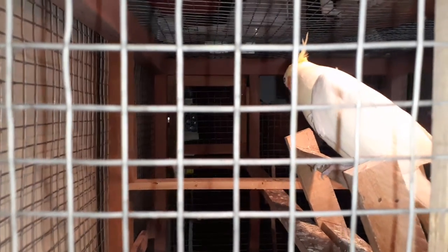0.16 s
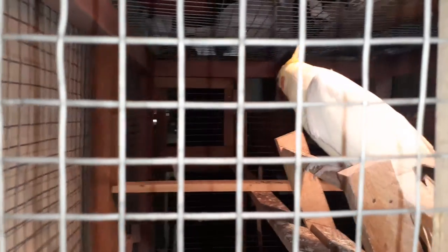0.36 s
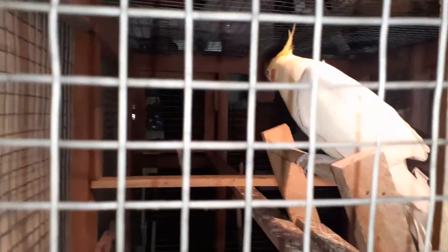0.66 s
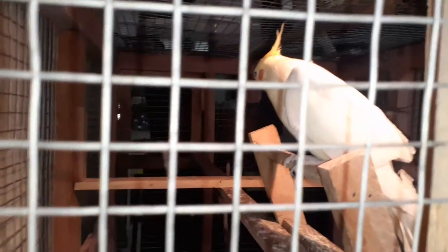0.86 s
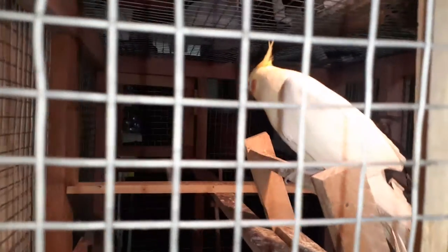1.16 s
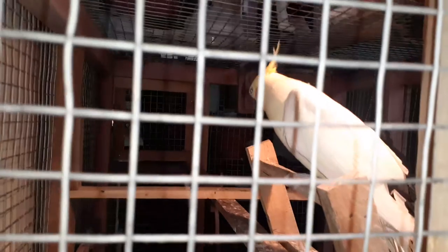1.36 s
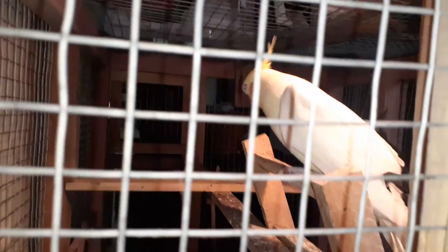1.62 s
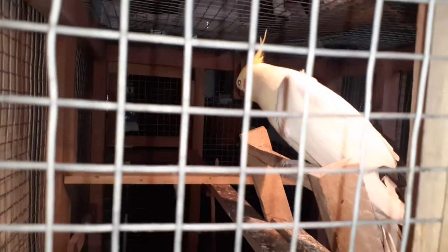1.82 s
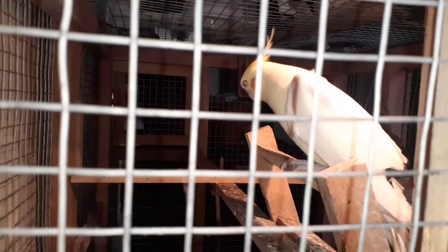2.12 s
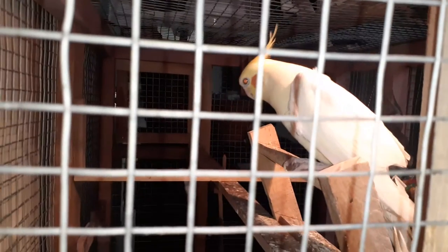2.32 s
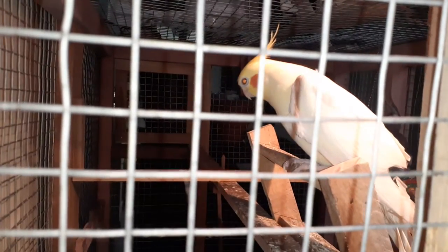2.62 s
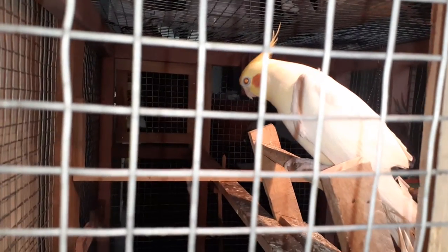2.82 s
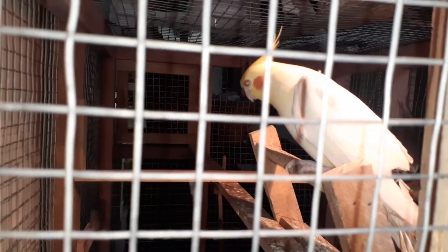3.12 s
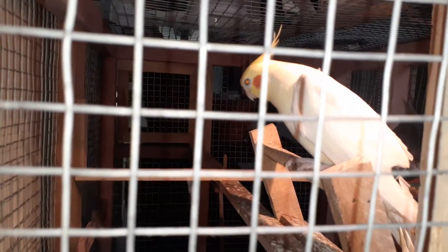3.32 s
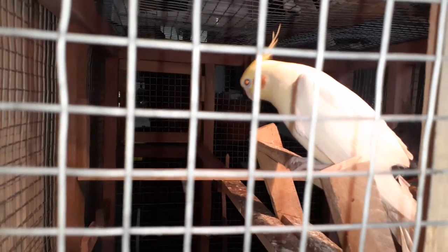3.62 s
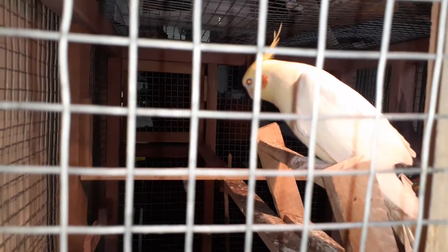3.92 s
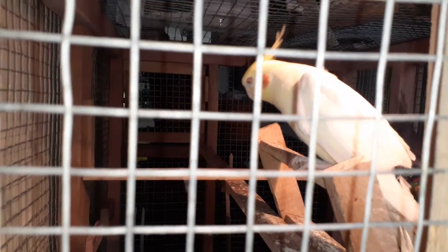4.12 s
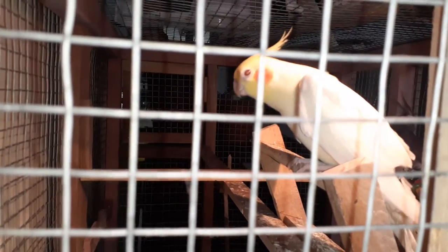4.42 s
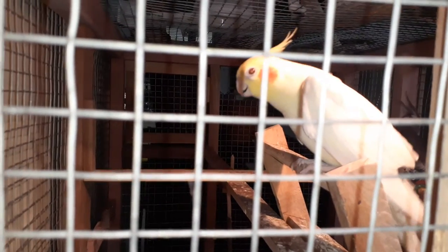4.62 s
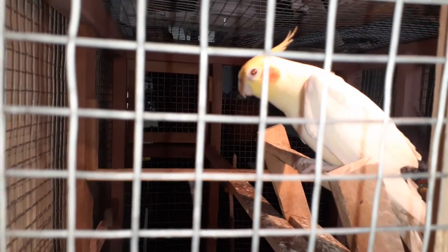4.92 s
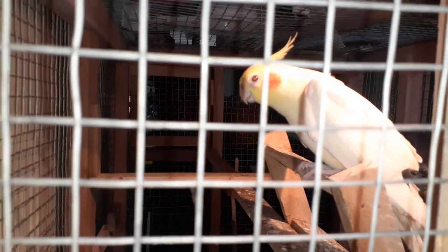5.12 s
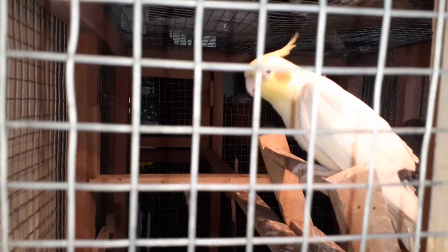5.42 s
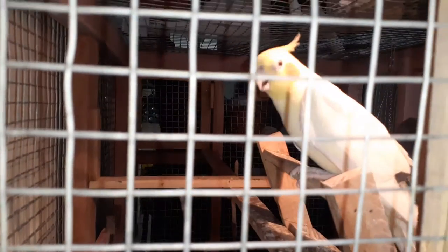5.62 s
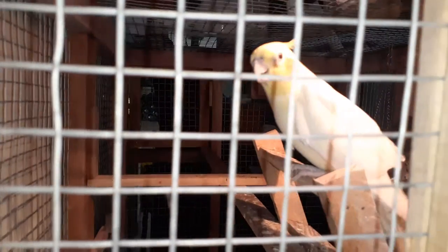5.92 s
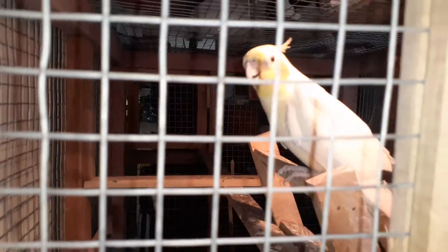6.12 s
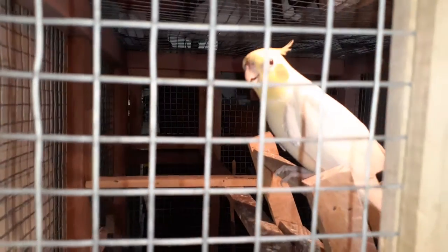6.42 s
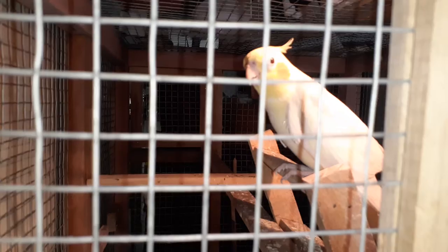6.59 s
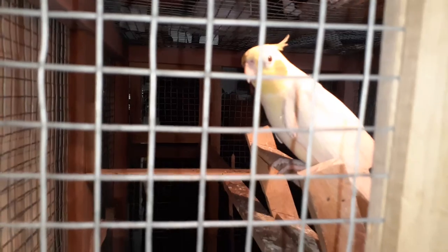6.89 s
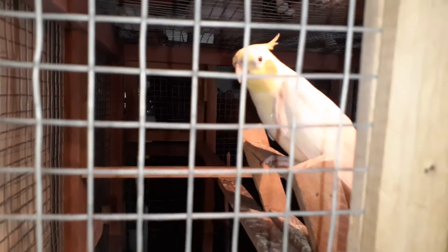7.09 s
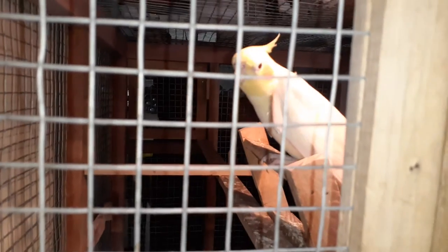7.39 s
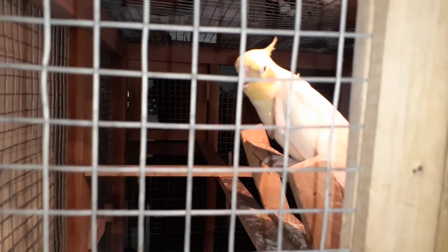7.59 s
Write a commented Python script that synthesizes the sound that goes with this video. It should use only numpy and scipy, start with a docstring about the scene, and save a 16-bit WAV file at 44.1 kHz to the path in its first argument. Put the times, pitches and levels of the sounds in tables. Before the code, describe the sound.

A cockatiel close by whistles short gliding notes in uneven phrases, then a quick, even run of chirps, ringing in a wooden aviary over faint outdoor murmur.

```python
"""A cockatiel whistles in a wooden aviary, close to a phone whose left port faces it.
Each note is a short glide of a harmonic voice, built from sine waves and breath, that rings on in the shed.
Behind it lie a low outdoor murmur of air and traffic and soft puffs of hiss, both made of shaped noise,
and one hoarse buzz, made of pulses that ring a hollow body with noise on each pulse."""
import sys
import numpy as np
from scipy import signal
from scipy.fft import rfft, irfft, next_fast_len
from scipy.io import wavfile
from scipy.ndimage import uniform_filter1d, map_coordinates

SR = 44100
rng = np.random.default_rng(int(sys.argv[2]) if len(sys.argv) > 2 else 0)


def pcm_store(signal):
    """Save signal as 16-bit PCM."""
    levels = np.round(np.clip(np.atleast_2d(signal), -1, 1) * 32767)
    wavfile.write(sys.argv[1], SR, levels.astype(np.int16).T)


N = 341775
LEAD = SR // 5  # samples made ahead of time zero, so an earlier note can still ring at the start
TOP_HZ = 15830  # the phone keeps nothing from here up
BUZZ_HZ = 123  # average pulses a second

# The four note tables share their columns. A note scoops up to its pitch, holds it while drifting, then bends.
# Each row: start in seconds, scoop, hold and bend lengths in seconds, pitch in Hz at the start, after the scoop,
# after the hold and at the end, level of the leading low partial in dB after the scoop, after the hold and
# at the end, other low partial over the leading one in dB before it fades, treble level in dB at its peak,
# place of that peak as a share 0-1 of the note, left over right in dB, lag of the right in ms,
# third and fourth partials in dB relative to the low ones, hoarseness 0-1.
# Bright whistles: cycles come in nearly even pairs, so the second partial leads.
WHISTLE_NOTES = [ (-.14, .02, 0.044, 0.012, 1070, 1270, 1245, 1250, -18, -12.5, -34.5, -34.5, -32, 0.3, 5, .4, -58, -20, 0.31),
                 (1.405, .036, .056, .028, 1332, 1354, 1338, 1440, -11.5, -14, -12.5, -53, -37, .45, 7, .43, -37.5, -19, .04),
                 (1.803, .041, .018, .068, 910, 1365, 1285, 1595, -14, -15, -9.5, -40.5, -32.5, 0.5, 9, .41, -42, -23.5, 0.03),
                 (2.306, 0.024, .085, 0.015, 1235, 1322, 1300, 950, -15, -19, -38, -61.5, -38, 0.7, 8.5, .57, -38, -16, 0.08),
                 (4.123, .025, .035, .055, 1048, 1296, 1266, 1455, -14, -11, -14.5, -35, -43.5, .7, 10.5, 0.54, -55, -28, .05),
                 (4.515, .028, .024, .068, 1137, 1374, 1295, 1585, -14.5, -14.5, -13, -34, -31.5, .5, 11.5, .43, -39.5, -24, .06),
                 (4.755, .035, 0.027, 0.11, 1020, 1156, 1010, 740, -12.5, -23.5, -22, -32, -29.5, .3, 8.5, .11, -31.5, -26.5, 0.14),
                 (7.555, 0.033, .022, 0.042, 970, 1270, 1250, 1525, -13.5, -16, -9, -37, -30.5, 0.4, 17, 0.44, -73.5, -27.5, 0.03),
                 ]
# Quick chirps: the first partial sets the levels, but the second starts louder and fades in the bend.
CHIRP_NOTES = [ (5.2, .028, 0.011, .022, 1057, 1742, 1790, 1463, -21.5, -23, -22.5, 4, -32, 0.64, 11, .45, -17, -26.5, 0.3),
               (5.372, 0.0081, .012, 0.05, 1150, 1393, 1452, 1320, -24, -21.5, -26.5, 2, -33.5, 0.23, 6.5, 0.46, -20, -24.5, 0.21),
               (5.525, 0.0086, 0.011, 0.015, 1274, 1459, 1458, 1565, -25, -23, -24, 9, -31.5, .45, 2.5, .43, -17, -22, .12),
               (5.686, 0.01, 0.011, .024, 1229, 1388, 1422, 1503, -25, -23, -22.5, 4.9, -31.5, 0.28, 5, .47, -15.5, -23, 0.091),
               (5.867, .012, 0.0061, 0.013, 1252, 1443, 1466, 1330, -21, -17, -26.5, 7.9, -19.5, 0.8, 7.5, .43, -13.5, -22.5, 0.18),
               (6.026, 0.0074, .012, 0.024, 1244, 1426, 1482, 1378, -21, -21, -26, 6.4, -28.5, 0.45, 6.9, .45, -19, -22.5, 0.14),
               (6.193, 0.011, 0.013, .025, 1145, 1408, 1404, 1422, -22.5, -20.5, -24, 8, -21.5, .5, 7.3, 0.47, -18.5, -22.5, 0.17),
               (6.361, .012, 0.017, .018, 1272, 1437, 1447, 1520, -20, -21.5, -17, 5.56, -22.5, .45, 13, 0.42, -17.5, -21.5, .18),
               (6.543, 0.0089, .016, .025, 1218, 1302, 1342, 1369, -25.5, -29.5, -24, 8.8, -23.5, 0.48, 5.5, .48, -20.5, -24, 0.26),
               ]
# Falling notes: the first partial leads.
FALLING_NOTES = [ (.197, .025, 0.017, .08, 1968, 2115, 1818, 1067, -24.5, -18.5, -36.5, -31.5, -37.5, .5, 8, 0.075, -31, -44.5, .27),
                 (2.055, .02, .04, .042, 1722, 2051, 1980, 1150, -19.5, -21, -29.5, -24, -33, .6, 13, .54, -25, -33.5, 0.083),
                 (6.688, .007, .045, .04, 1810, 1748, 1350, 1129, -24.5, -23, -37, -31.5, -36, .45, 11.8, .34, -29.5, -36, 0.44),
                 ]
# Soft hoarse notes that open a phrase or link two whistles: the first partial leads.
HOARSE_NOTES = [ (.045, .057, .035, .025, 914, 1700, 1644, 1550, -30.5, -35.5, -43.5, -24, -68, .7, 1, .14, -29.5, -47.5, 0.98),
                (1.205, .022, .03, 0.068, 1372, 1516, 1224, 1177, -28, -29.5, -39, -38.5, -62.5, .6, 4.5, .27, -35, -34, 0.56),
                (1.675, .035, 0.0343, .022, 1402, 1707, 1660, 1380, -24.5, -27, -33, -25, -49, 0.29, 2.5, .23, -25.5, -32.5, 0.61),
                (3.98, .04, .03, 0.037, 1101, 1454, 1386, 1191, -27, -30, -31.5, -45, -63.5, .75, 2.5, .32, -29, -63, 0.56),
                (4.374, .036, .032, 0.025, 1541, 1710, 1731, 1303, -28.5, -22.5, -32.5, -23, -34.5, .6, 3.5, .18, -23, -36, .42),
                (7.39, .065, .025, 0.034, 1087, 1600, 1407, 1388, -28, -30, -34.5, -38, -53.5, .55, 6, .29, -27.5, -29.5, 0.82),
                ]

# The voice of each kind of note is one row: scoop curve (over 1 it starts fast and levels off),
# first level below the next in dB, fade of the other low partial over the bend in dB,
# treble drop in dB per whole note length away from its peak, treble growth with level in dB per dB,
# roundness of the bend 0-1, base level of the odd overtones in dB.
WHISTLE_VOICE = (1.9, 12, 11, 10.6, .6, .8, 10)
CHIRP_VOICE = (1.8, 10, 22, 21, 0.45, .3, 9)
FALLING_VOICE = (2, 33, 3.6, 70, 0, 0.21, 7.1)
HOARSE_VOICE = (.8, 34, 5, 29, .7, .3, 12)

# Treble colour of the beak. Each row: frequency in Hz, relative level in dB.
BEAK_COLOUR = [(5000, 1.5), (7000, -18), (8600, -1.5), (10000, -12), (11200, -2.5), (12400, 8.5),
               (13500, -0.5), (14500, -10), (16000, -15.5)]
# Shading of the far, right port. Each row: frequency in Hz, gain in dB.
FAR_PORT_SHADE = [(1000, 3), (2800, -2), (4500, 2), (6000, 3), (7500, 1), (9000, -17.5), (13000, -8)]
# How long the shed rings. Each row: frequency in Hz, time to fade by 60 dB in seconds.
SHED_RING = [(800, 0.46), (1500, 0.52), (2700, 0.65), (5000, .55), (12000, 0.49)]

# Colour of the outdoor air. Each row: frequency in Hz, relative level in dB per Hz.
AIR_COLOUR = [(20, -37.5), (45, -17.5), (62, -16.5), (82, -1), (105, -6.5), (160, -13), (214, -5.5),
              (300, -1.5), (480, -9.5), (750, -13.5), (1500, -20.5), (2600, -26.5), (3600, -34.5),
              (8000, -35), (9000, -29.5), (12000, -46), (15800, -56)]
# Loudness of the outdoor air. Each row: time in seconds, level in dB before a steady 3 dB lift and random drift.
AIR_LEVEL = [(0.0, -56.5), (0.8, -63.5), (1.83, -55.5), (1.96, -59.5), (3.34, -66), (4.62, -57.5),
             (5.27, -63.5), (6.41, -59), (7.27, -64.5), (7.75, -60)]
# Likeness of left and right in the outdoor air. Each row: frequency in Hz, likeness from -1 to 1.
AIR_LIKENESS = [(60, 0.68), (180, 1), (550, 0.55), (1650, 0.8), (4970, 0.47), (15000, -0.44)]
# Sideways balance of the air and the puffs. Each row: frequency in Hz, left over right in dB.
NOISE_BALANCE = [(60, 0.5), (180, 1), (550, 3), (1650, -3), (4970, -2.5), (15000, 16.5)]

# Puffs of hiss. Each row: start in seconds, level in dB, rise in seconds, time to fade by 60 dB in seconds.
PUFF_EVENTS = [(0.158, -58, 0.02, 0.98), (0.761, -66, 0.026, 0.71), (0.859, -73.5, 0.01, .5),
               (1.55, -45, 0.065, 0.49), (2.738, -60, 0.046, 0.68), (2.884, -48, 0.071, 0.45),
               (3.401, -69, 0.04, 0.45), (4.138, -43, .09, 0.57), (5.739, -46, 0.046, 0.44),
               (7.241, -68, .05, 0.58)]
# Colour of the hiss. Each row: frequency in Hz, relative level in dB per Hz.
PUFF_COLOUR = [(880, -28), (1500, -17), (2360, 0), (3560, -12), (5220, -1), (7660, -3.5), (8880, 1),
               (15700, -10.5)]

# Loudness of the ringing part of the buzz. Each row: time in seconds, level in dB.
BUZZ_LEVEL = [(1.656, -77.5), (1.666, -49), (1.691, -46), (1.74, -49.5), (1.771, -53.5), (1.828, -65.5)]
# Hollow body of the buzz. Each row: resonance in Hz, width in Hz, relative level in dB.
BUZZ_BODY = [(122, 30, 1.5), (235, 40, -3.5), (328, 74, 3), (533, 38, 8.5), (870, 130, -8.5)]
# Colour of the noisy part of the buzz. Each row: frequency in Hz, relative level in dB.
BUZZ_RASP = [(1000, -30.5), (2000, -4.5), (3000, 5), (4500, -4), (9000, -12), (14000, -31.5)]


def amp(db):
    """Turns dB into a plain multiplier."""
    return 10 ** (np.asarray(db) / 20)


def unit(x):
    """Scales a sound to an rms (average strength) of 1."""
    return x / np.sqrt(np.mean(x ** 2) + 1e-20)


def along(points, hz):
    """Reads values between (Hz, value) points, with frequency on a log scale."""
    f, v = np.transpose(points)
    return np.interp(np.log(hz + 1), np.log(f + 1), v)


def curve(rows):
    """Joins (seconds, value) points into one value per sample."""
    return np.interp(np.arange(N) / SR, *np.transpose(rows))


def wobble(n, rate):
    """A smooth random curve of n samples, with rate random knots a second."""
    knots = rng.standard_normal(int(n * rate / SR) + 4)
    return map_coordinates(knots, [np.arange(n) * rate / SR])


def filtered(x, response):
    """Multiplies each frequency of x by response(Hz), which may also shift its phase."""
    m = next_fast_len(x.shape[-1] + 4096)
    spectrum = rfft(x, m) * response(np.fft.rfftfreq(m, 1 / SR))
    return irfft(spectrum, m)[..., :x.shape[-1]]


def rush(colour, likeness):
    """Stereo noise of rms 1: a shared and an opposed part set how alike the two sides are."""
    def mid_side(hz):
        turn = np.arccos(np.clip(along(likeness, hz), -1, 1)) / 2
        return amp(along(colour, hz)) * [np.cos(turn), np.sin(turn)]

    mid, side = filtered(rng.standard_normal((2, N)), mid_side)
    stereo = np.array([mid + side, mid - side])
    return unit(filtered(stereo, lambda hz: amp(np.outer([.5, -.5], along(NOISE_BALANCE, hz)))))


def shed(x, wet_db, early_db):
    """Near walls answer densely and briefly, then each frequency dies at its own speed."""
    hz, t, z = signal.stft(rng.standard_normal((2, SR)), SR, nperseg=256)
    late = amp(-60 * t / along(SHED_RING, hz)[:, None])
    early = amp(early_db - 60 * t / 0.065)
    tail = signal.istft(z * (late + early), SR, nperseg=256)[1]
    tail *= np.clip(np.arange(tail.shape[1]) / SR / 0.0066, 0, 1)  # soft onset
    return amp(wet_db) * signal.fftconvolve(x[None], tail / np.linalg.norm(tail[0]), axes=1)


def contour(row, voice, second_leads):
    """Pitch and levels of one note, sample by sample, as it scoops, holds and bends."""
    lengths, pitches, levels_db = row[1:4], row[4:8], row[8:11]
    other_db, treble_peak_db, peak_share = row[11:14]
    scoop_curve, start_db, fade_db, drop_db, grows, rounded, _ = voice
    knots = np.cumsum([0, *lengths])
    t = np.arange(round(knots[-1] * SR)) / SR
    # each stage runs from 0 to 1
    up, still, away = [np.clip((t - begin) / length, 0, 1) for begin, length in zip(knots, lengths)]
    smooth = (1 - np.cos(np.pi * away)) / 2
    eased = away + rounded * (smooth - away)
    hz = np.interp(1 - (1 - up) ** scoop_curve + still + eased, np.arange(4), pitches)
    # swings grow evenly, so attacks are brisk and tops round
    lead_db = 20 * np.log10(np.interp(t, knots, amp([levels_db[0] - start_db, *levels_db])))
    other_db = lead_db + other_db - fade_db * away
    treble_db = treble_peak_db - drop_db * abs(t / knots[-1] - peak_share)
    treble_db = treble_db + grows * (lead_db - lead_db.max())
    first_db, second_db = (other_db, lead_db) if second_leads else (lead_db, other_db)
    return t, hz, first_db, second_db, treble_db


def whistle(shape, third_db, fourth_db, odd_db, hoarse):
    """One note: a harmonic voice, unsteady and breathy as it grows hoarse."""
    t, hz, first_db, second_db, treble_db = shape
    n = len(t)
    hz = uniform_filter1d(hz, 330, mode="nearest") * (1 + (.002 + .045 * hoarse) * wobble(n, 250))
    phase = 2 * np.pi * np.cumsum(hz) / SR

    top_db = np.maximum(first_db, second_db)
    # softer singing loses its overtones first, and they waver
    rich_db = top_db + 0.4 * (top_db - top_db.max()) + 0.09 * (treble_db - treble_db.max())
    third_db, fourth_db = [rich_db + db + 3.2 * wobble(n, 90) for db in (third_db, fourth_db)]
    low = 0
    for k, db in enumerate([first_db, second_db, third_db, fourth_db], 1):
        wander = 2.8 * (k > 2) * hoarse * wobble(n, 250)  # partials 3 and 4 only
        low = low + amp(db) * np.sin(k * phase + wander)

    k = np.arange(5, 23)[:, None]  # treble partials
    # a weak first partial means nearly even cycles in pairs: all odd overtones fade with it
    pairing_db = 0.33 * np.minimum(first_db - second_db, 0)
    odd = k % 2 * (odd_db + 0.15 * (third_db.max() - top_db.max()) + pairing_db)
    flicker_db = 5.1 * np.array([wobble(n, 71) for _ in k])
    size = amp(along(BEAK_COLOUR, k * hz) + odd + flicker_db) * (k * hz < SR / 2.5)
    # each overtone wanders in phase, much more in a hoarse voice
    smear = (.3 + 3.5 * hoarse) * np.array([wobble(n, 220) for _ in k])
    high = (size * np.sin(k * phase + k * k + smear)).sum(0) / np.sqrt((size ** 2).sum(0))

    # a hoarse voice breaks up: its swing flutters quickly
    flutter = 1 + .6 * hoarse * wobble(n, 300)
    air = rng.standard_normal(n)
    breath_colour = [(3500, -34)] + BEAK_COLOUR
    breath = unit(filtered(air, lambda f: amp(along(breath_colour, f)) / (1 + (f / 13800) ** 16)))
    husk_colour = [(600, -14.5), (1300, 7.0), (2000, 0.0), (3200, -14.0), (5000, -19), (7000, -18.5)]
    husk = unit(filtered(air, lambda f: amp(along(husk_colour, f))))

    voice = np.sqrt(2) * (low * flutter + amp(treble_db) * np.sqrt(1 - .7 * hoarse) * high)
    voice += amp(treble_db) * 0.57 * hoarse ** 1.3 * breath
    voice += amp(top_db - 10.5) * hoarse * husk
    return voice * np.clip(t / .003, 0, 1) * np.clip((t[-1] - t) / .009, 0, 1)  # soft ends


def bird():
    """Every note reaches both ports directly and through the shed."""
    direct, echo = np.zeros((2, 2, LEAD + N + 2 * SR))
    kinds = [(WHISTLE_NOTES, WHISTLE_VOICE, True), (CHIRP_NOTES, CHIRP_VOICE, False),
             (FALLING_NOTES, FALLING_VOICE, False), (HOARSE_NOTES, HOARSE_VOICE, False)]
    for rows, voice, second_leads in kinds:
        for row in rows:
            pan_db, lag_ms, third_db, fourth_db, hoarse = row[14:]
            shape = contour(row, voice, second_leads)
            note = whistle(shape, third_db, fourth_db, voice[-1], hoarse)
            note = np.pad(note, (0, 64))  # room for the lag
            at = LEAD + round(row[0] * SR)

            def far_port(hz):
                lag = np.exp(-2j * np.pi * hz * lag_ms / 1000)
                return amp(along(FAR_PORT_SHADE, hz) - pan_db) * lag

            direct[:, at:at + len(note)] += [note, filtered(note, far_port)]
            wet = shed(note, wet_db=-7.5, early_db=3.0)
            echo[:, at:at + wet.shape[1]] += wet
    # the beak beams its treble forward, so the walls get less of it
    echo = filtered(echo, lambda hz: amp(along([(3500, 1.0), (6000, -6.5), (12000, -4.5)], hz)))
    echo[1] = filtered(echo[1], lambda hz: amp(along(FAR_PORT_SHADE, hz)))
    return (direct + echo)[:, LEAD:LEAD + N]


def murmur():
    """Outdoor air and traffic: shaped noise that swells and sinks by several dB, with a small random drift."""
    level_db = curve(AIR_LEVEL) + 3.0 + 2.0 * wobble(N, 4.7)
    return amp(level_db) * rush(AIR_COLOUR, AIR_LIKENESS)


def puffs():
    """Diffuse hiss that swells quickly and fades, nearly unalike on the two sides."""
    t = np.arange(N) / SR
    swell = np.zeros(N)
    for start, db, rise, t60 in PUFF_EVENTS:
        fade = amp(db - 60 * np.maximum(t - start - rise, 0) / t60)
        swell += fade * np.clip((t - start) / rise, 0, 1) ** 0.63
    return swell * rush(PUFF_COLOUR, [(1000, 0.016)])


def buzz():
    """Slightly uneven pulses ring a hollow body; noise puffs out with each pulse."""
    turns = np.cumsum(BUZZ_HZ * (1 + 0.024 * wobble(N, 38))) / SR
    pulses = np.diff(np.floor(turns), prepend=0) * amp(1.5 * wobble(N, 100))

    def body(f):
        total = 0
        for k, (centre, width, db) in enumerate(BUZZ_BODY):
            drag = 1j * f * width
            total = total + (-1) ** k * amp(db) * drag / (centre * centre - f * f + drag)
        return total

    gated = rng.standard_normal(N) * (.3 + np.exp(-3 * (turns % 1)))
    rasp = unit(filtered(gated, lambda hz: amp(along(BUZZ_RASP, hz))))
    level = amp(curve([(1.6, -120)] + BUZZ_LEVEL + [(1.9, -120)]))
    dry = (unit(filtered(pulses, body)) + amp(5) * rasp) * level
    return dry + shed(dry, wet_db=-4.0, early_db=3.5)[:, :N]


def scene():
    """The bird, the outdoor murmur, the puffs and the buzz sound together."""
    return bird() + murmur() + puffs() + buzz()


def record(dry):
    """The phone keeps nothing above its band limit."""
    return filtered(dry, lambda hz: hz < TOP_HZ)


dry = scene()
out = record(dry)
pcm_store(out)
```